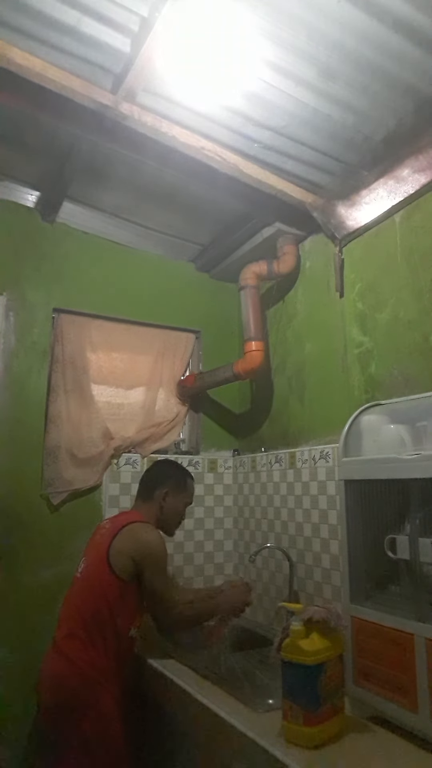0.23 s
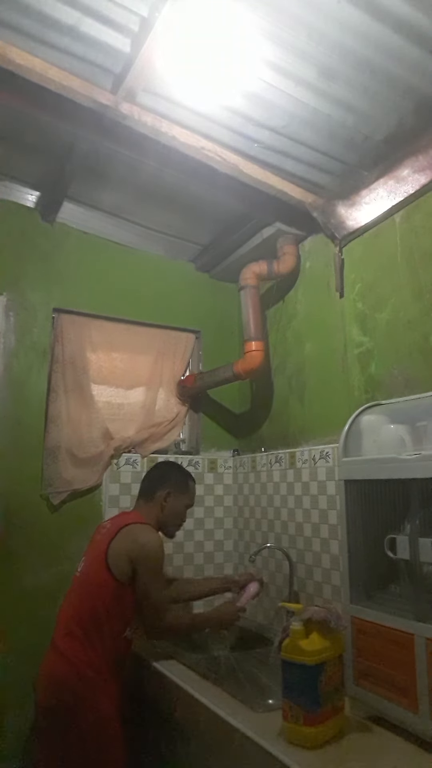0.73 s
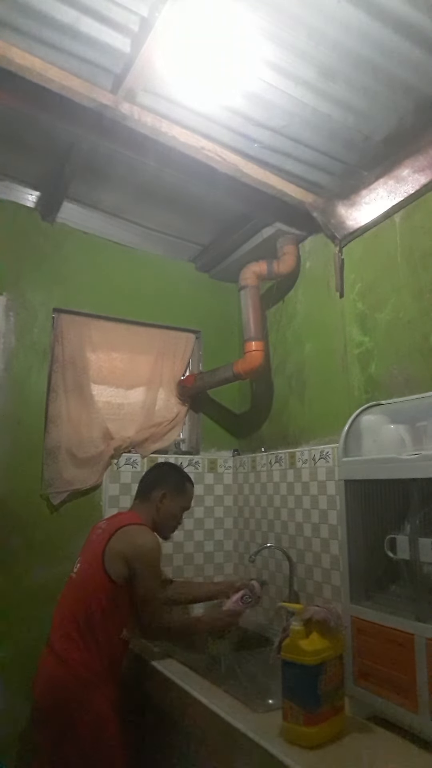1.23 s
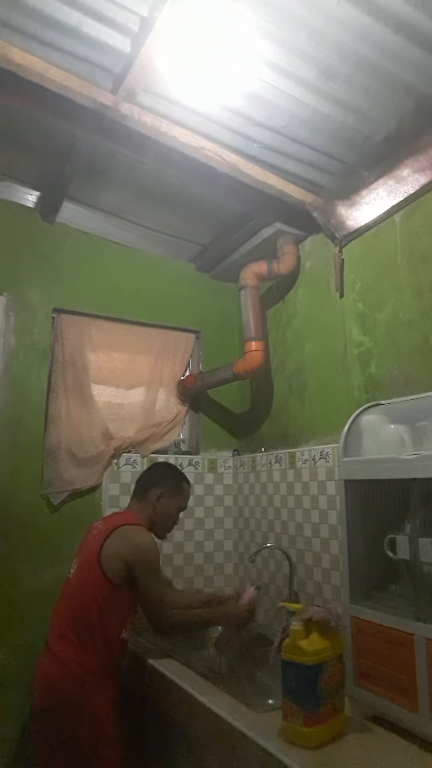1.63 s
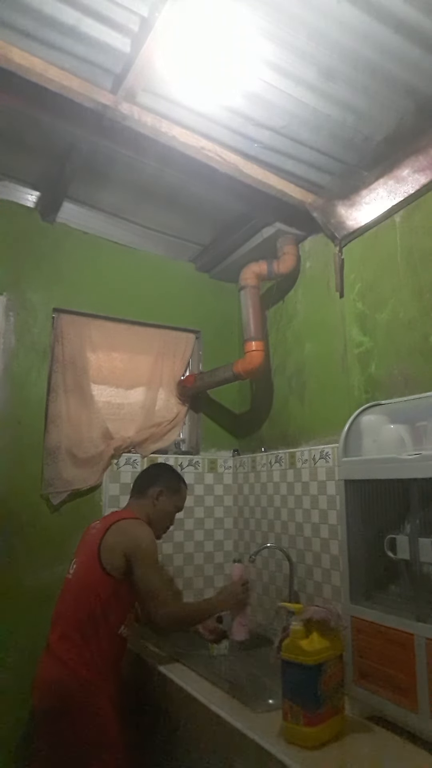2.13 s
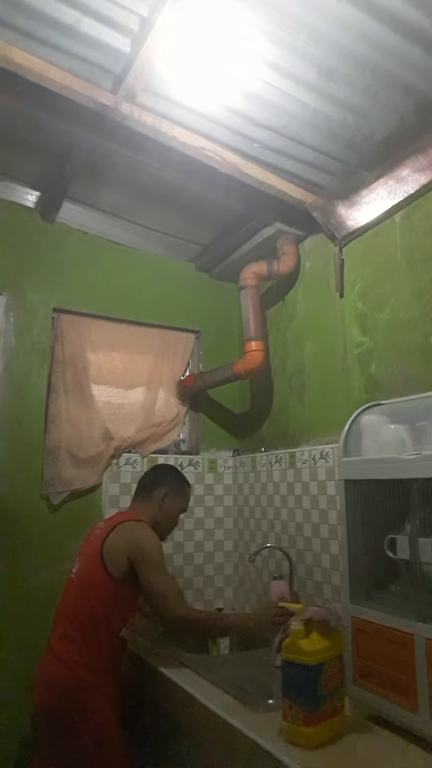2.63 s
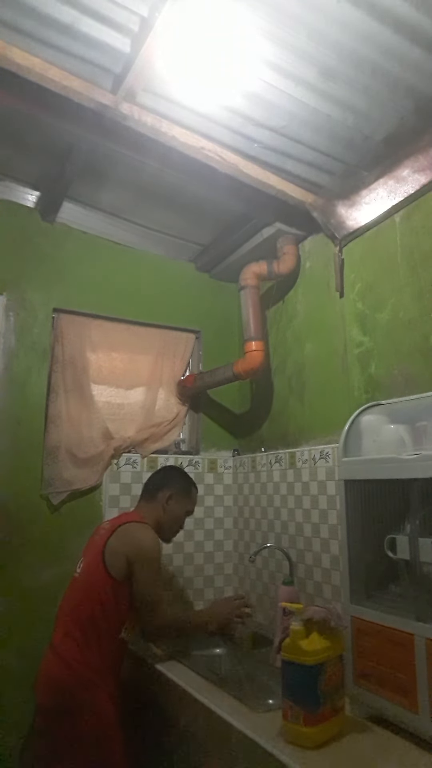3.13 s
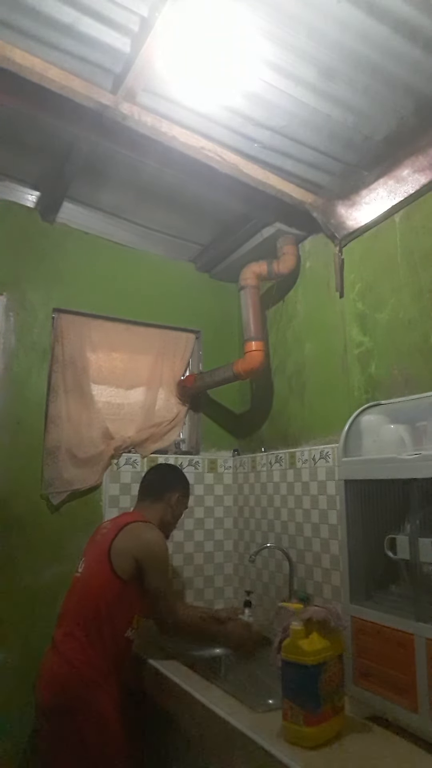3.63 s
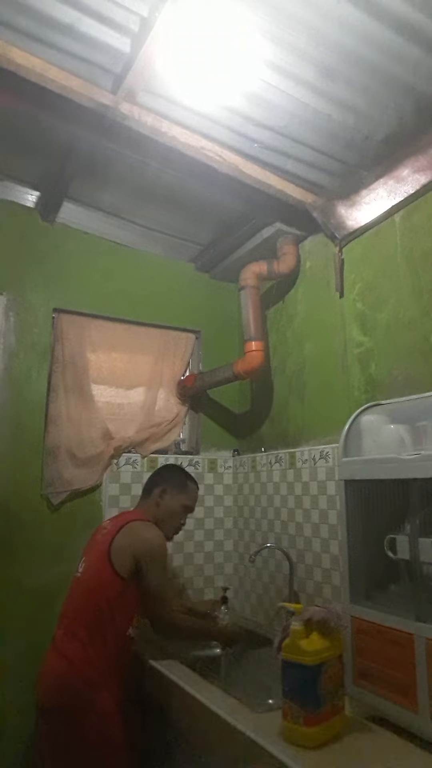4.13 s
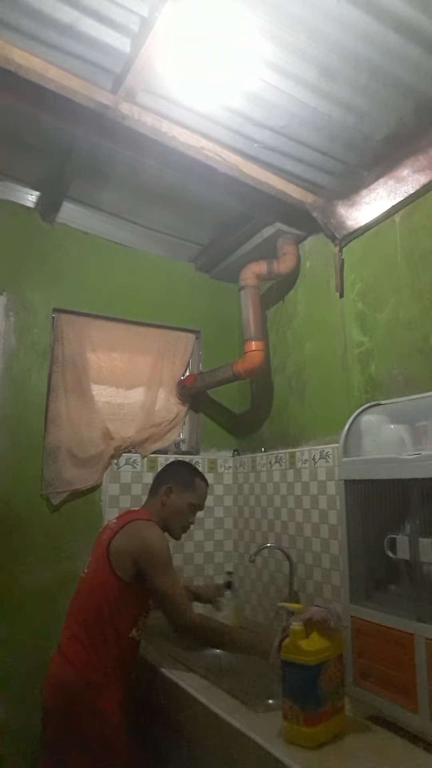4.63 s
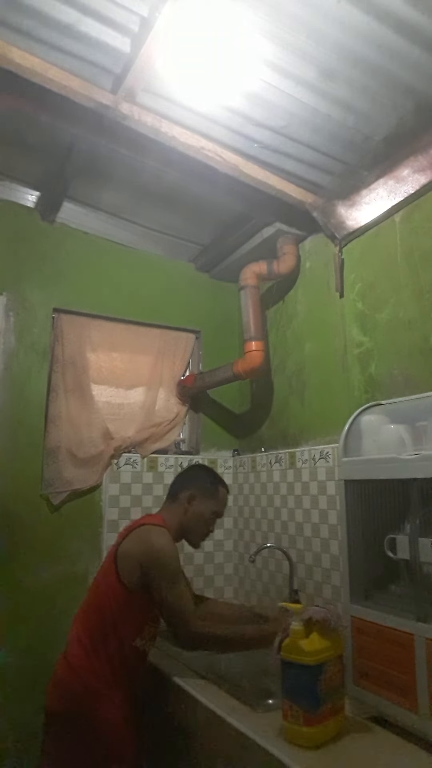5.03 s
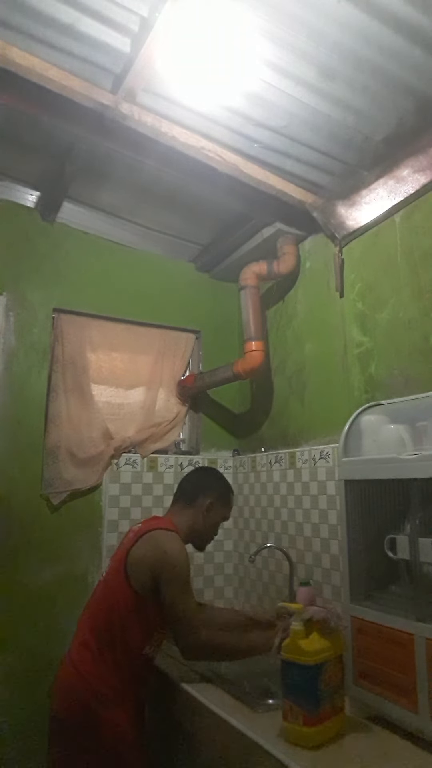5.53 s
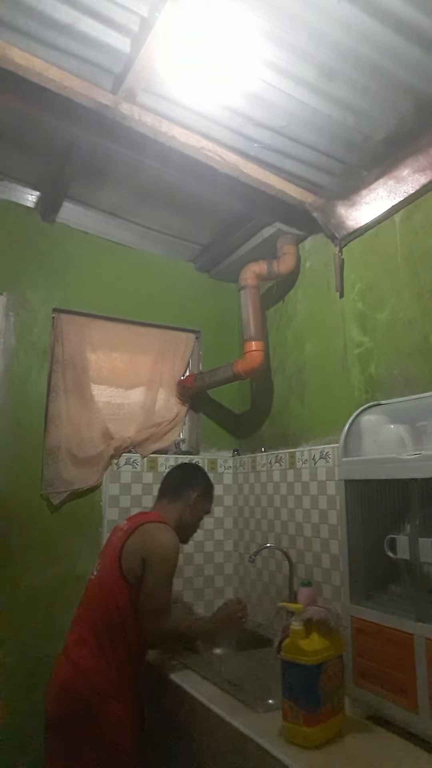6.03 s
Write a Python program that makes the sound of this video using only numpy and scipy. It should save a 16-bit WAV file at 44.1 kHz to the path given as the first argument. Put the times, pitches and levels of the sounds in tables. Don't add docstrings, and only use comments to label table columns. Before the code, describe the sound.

Wet dishes are rubbed and tapped in a hollow metal sink, then one heavy dull thud booms through the basin, followed by scattered knocks.

```python
import sys
import numpy as np
from scipy import signal
from scipy.fft import rfft, irfft
from scipy.io import wavfile
from scipy.ndimage import uniform_filter1d

SR = 44100
rng = np.random.default_rng(int(sys.argv[2]) if len(sys.argv) > 2 else 0)


def ratio_of_db(decibels):
    return 10 ** (np.asarray(decibels, float) / 20)


def master(y):
    cut = np.clip(np.atleast_2d(y).T, -1, 1)
    pcm = np.round(cut * 32767)
    wavfile.write(sys.argv[1], SR, pcm.astype(np.int16))


N = 277389
T = np.arange(N) / SR
PIECE_T = np.arange(8192) / SR
DECAY_60 = np.log(1000)


def unit(x):
    return x / np.sqrt(np.mean(x ** 2))


def curve(table, col):
    rows = np.array(table)
    return ratio_of_db(np.interp(T, rows[:, 0], rows[:, col]))


def band(x, lo_hz, hi_hz):
    sos = signal.butter(2, [lo_hz, min(hi_hz, .45 * SR)], "band", fs=SR, output="sos")
    return signal.sosfilt(sos, x)


def coloured(points, size=N):
    hz, db = np.transpose(points)
    f = np.fft.rfftfreq(size, 1 / SR) + 1
    gain = ratio_of_db(np.interp(np.log(f), np.log(hz), db))
    return unit(irfft(rfft(rng.standard_normal(size)) * gain, size))


def walk(rate):
    k = int(SR / rate)
    return unit(uniform_filter1d(rng.standard_normal(N)[np.arange(N) // k], k))


def ring(force, modes):
    out = 0
    for pitch_hz, level_db, t60_s in modes:
        pole = np.exp(2j * np.pi * pitch_hz / SR - DECAY_60 / (t60_s * SR))
        ringing = signal.lfilter([0, pole.imag], [1, -2 * pole.real, abs(pole) ** 2], force)
        out = out + ratio_of_db(level_db) * ringing
    return out


def add(track, start_s, piece):
    i = max(int(start_s * SR), 0)
    track[i:i + len(piece)] += piece[:N - i]


def burst(length_s, rise_s):
    noise = rng.standard_normal(len(PIECE_T))
    return noise * (1 - np.exp(-PIECE_T / rise_s)) * np.exp(-PIECE_T / length_s)


def after(times_s, levels_db, t60_s, swell_s=0.01):
    t = T[::32]
    age = np.maximum(t - np.array(times_s)[:, None], 0)
    swell = (1 - np.exp(-age / swell_s)) ** 2
    power = ratio_of_db(2 * np.array(levels_db)) @ (swell * np.exp(-2 * DECAY_60 * age / t60_s))
    return np.interp(T, t, power)


# (pitch_hz, level_db per Hz)
AIR_COLOUR = [(24, -38.5), (40, 1.5), (80, 1), (139, -4.5), (202, -10.5), (325, -2.5), (387, -15),
              (722, -14.5), (860, -17.5), (1080, -22), (2850, -27), (7920, -44), (13400, -35),
              (15500, -31.5)]


def air():
    level_db = -59
    return ratio_of_db(level_db + 0.5) * coloured(AIR_COLOUR) * ratio_of_db(.5 * walk(3.4))


# (start_s, peak_db, centre_hz, length_s)
SPLASHES = [(0.004, -49, 2470, 0.022), (0.17, -60.5, 4480, 0.035), (0.6094, -62, 3420, 0.035),
            (1.0173, -67.5, 3390, 0.035), (1.1351, -52.5, 3130, 0.034), (1.203, -59, 3500, 0.023),
            (1.5846, -62, 4340, 0.044), (1.8674, -63, 2930, 0.037), (2.17, -60.5, 4030, 0.035),
            (2.5466, -55, 2900, 0.034), (3.897, -49, 3320, 0.0264), (4.168, -57, 3500, 0.035),
            (4.33, -64, 4600, 0.046), (4.42, -56, 3060, 0.035), (4.557, -50, 2250, 0.036),
            (5.0105, -67.5, 3200, 0.032), (5.1841, -57, 2960, 0.03), (5.377, -62, 3520, 0.035),
            (5.862, -59, 2100, 0.035), (5.6377, -70, 3000, 0.035)]


def splashes():
    out = np.zeros(N)
    for start_s, peak_db, centre_hz, length_s in SPLASHES:
        fizz = band(burst(length_s, rise_s=0.0029), centre_hz / 1.65, centre_hz * 1.027)
        add(out, start_s, ratio_of_db(peak_db + 4.5) * band(fizz, centre_hz / 1.13, centre_hz * 1.4))
    return out


# (start_s, peak_db, length_s)
TICKS = [(0.1146, -58.5, 0.012), (1.133, -52.5, 0.011), (1.4481, -63.5, 0.011), (1.964, -55.5, 0.014),
         (2.208, -59, 0.012), (2.4743, -62.5, 0.011), (2.833, -60, 0.012), (2.9981, -60.5, 0.013),
         (3.901, -48, 0.014), (4.207, -66, 0.012), (4.334, -59, 0.013), (4.4024, -58, 0.012),
         (5.009, -57, 0.01), (5.532, -61.5, 0.012), (5.8416, -54, 0.011), (5.9683, -59, 0.012)]


def ticks():
    out = np.zeros(N)
    for start_s, peak_db, length_s in TICKS:
        add(out, start_s, ratio_of_db(peak_db - 1.5) * burst(length_s, rise_s=0.00071))
    return band(band(out, 11500, 18000), 11550, 18000)


# (time_s, level_db)
SPRAY = [(0, -75), (0.33, -81), (1.1, -78), (1.35, -77), (1.8, -77), (3.05, -73.5), (3.38, -79),
         (3.88, -79), (4.0, -74), (4.6, -74), (5.8, -73.5), (6.29, -75)]


def spray():
    mist_db, mist_t60_s = -16, .3
    hiss = unit(band(rng.standard_normal(N), 11200, 15000)) * ratio_of_db(.7 * walk(15))
    start_s, peak_db, _ = np.transpose(TICKS)
    mist = after(start_s, peak_db + mist_db, mist_t60_s)
    return ratio_of_db(-3.5) * hiss * np.sqrt(curve(SPRAY, 1) ** 2 + mist)


def water(stir):
    fizz = unit(band(rng.standard_normal(N), 3140, 5200)) * stir ** .4 * ratio_of_db(2.2 * walk(18))
    return splashes() + ticks() + spray() + ratio_of_db(-55.5) * fizz


# (middle_s, pitch_hz, length_s, level_db)
RUBS = [(0.64, 320, 0.1, -45.5), (0.802, 265, 0.055, -57), (0.891, 300, 0.066, -52),
        (1.03, 165.8, 0.12, -48.5), (1.045, 585, 0.037, -53.5), (1.158, 318, 0.107, -51.5),
        (1.283, 330, 0.16, -59), (1.466, 311, 0.048, -55.5), (1.64, 148, 0.047, -54),
        (1.708, 318, 0.064, -49), (1.836, 228, 0.12, -52), (1.87, 560, 0.11, -62), (2.114, 320, 0.072, -52),
        (2.173, 80.6, .08, -52), (2.379, 415, 0.27, -53), (2.698, 70, 0.25, -43.5),
        (3.173, 318, 0.16, -54.5), (3.811, 316, 0.086, -51.5), (4.939, 72, 0.036, -43),
        (4.16, 200, 0.13, -48), (5.207, 760, 0.1, -56.5), (5.43, 544, 0.093, -43), (5.45, 200, 0.116, -42),
        (5.93, 195, 0.068, -53), (4.0, 856, 0.11, -47), (0.861, 1750, 0.035, -74), (5.9, 509, 0.074, -48),
        (2.481, 1250, 0.027, -66), (5.651, 87, 0.15, -46), (6.22, 469.6, 0.11, -51)]


def rubs():
    out = np.zeros(N)
    t = np.arange(-SR // 4, SR // 4) / SR
    for middle_s, pitch_hz, length_s, level_db in RUBS:
        wobble = 1 + 0.019 * np.sin(2 * np.pi * (9 * t + rng.random()))
        tone = np.sin(2 * np.pi * pitch_hz * np.cumsum(wobble) / SR)
        swell = np.exp(-(2 * t / length_s) ** 2)
        add(out, middle_s + t[0], ratio_of_db(level_db + 2.0) * swell * tone)
    return out * ratio_of_db(2.4 * walk(45))


# (time_s, level_db)
HANDS = [(0, -54.5), (0.25, -58.5), (0.5, -61), (0.65, -58), (0.85, -61), (1.17, -53.5), (1.4, -61),
         (1.5, -56), (1.86, -55.5), (1.98, -59.5), (2.25, -57.5), (2.8, -55.5), (3.1, -53), (3.36, -64),
         (3.87, -64), (4.5, -55), (5.7, -54), (6.29, -54)]
# (over_hands_db, over_blow_db, growth_db per dB of blow, t60_s)
SHUDDER = [
    (-3.5, -10.5, 0.78, 0.41),
    (1, -13, 0.99, 0.39),
    (-3.5, -7.5, 0.96, 0.48),
    (-11, -6, 1.12, .45),
]


def shudder():
    start_s, basin_db, boom_db, _, clatter_db = np.transpose(contacts())
    rim_db = (basin_db + clatter_db) / 2
    strengths = []
    for hit_db, row in zip((boom_db, basin_db, rim_db, clatter_db), SHUDDER):
        work_db, blow_db, growth, t60_s = row
        work = ratio_of_db(work_db) * curve(HANDS, 1)
        left_over = after(start_s, blow_db + growth * hit_db, t60_s)
        strengths.append(np.sqrt(work ** 2 + left_over))
    return strengths


# (pitch_hz, level_db, t60_s)
COUNTER = [(70, 5.5, 0.14), (87, 1.5, 0.36), (107, -13.5, 0.04)]
# (pitch_hz, level_db, t60_s)
BASIN = [(152.6, -2.5, 0.21), (200, -6, 0.27), (275, 1.5, 0.1), (318, 2, 0.19), (338, -9.5, 0.35)]
# (pitch_hz, level_db, t60_s)
RIM = [(415, -5, 0.28), (450.7, -1.5, 0.13), (488.2, 2, 0.062), (560, 2, 0.047), (612.6, -2.5, 0.067),
       (663, -5.5, 0.039), (754, -6.5, 0.078), (855, -15, 0.21)]
# (pitch_hz, level_db, t60_s)
WALLS = [(894, -5, .08), (997, -1.5, 0.062), (1110, -5.5, 0.046), (1193, -4.5, 0.041), (1322, 0, 0.021),
         (1426, 0, 0.022), (1560, -3, 0.033), (1750, 0.5, 0.011), (2050, -8, 0.015), (2253, -13, 0.028),
         (2530, -37, 0.06)]


def hands(strengths):
    out, effort = 0, walk(14)
    for strength, modes in zip(strengths, (COUNTER, BASIN, RIM, WALLS)):
        grip = ratio_of_db(2.7 * effort + 0.83 * walk(40)) * rng.standard_normal(N)
        shake = ring(band(grip, 0.63 * modes[0][0], 1.266 * modes[-1][0]), modes)
        hold = np.sqrt(uniform_filter1d(shake ** 2, int(.08 * SR)))
        out = out + strength * shake / hold
    return ratio_of_db(-2.0) * out


# (start_s, basin_db, boom_db, dish_hz, clatter_db)
BLOWS = [(0.110, -37, -57, 419, -53), (2.545, -25, -26.5, 208, -45), (2.576, -29, -46, 415, -45),
         (2.608, -26.5, -45, 197.2, -56), (2.676, -43, -55, 194.5, -62), (3.893, -20, -29, 232, -36),
         (3.911, -9.5, -10, 275, -34.5), (3.951, -28.5, -36.5, 362, -41.5), (3.981, -21, -45, 207.5, -51.5),
         (4.036, -16, -23, 139.5, -47), (4.089, -26, -25.5, 283, -49.5), (4.399, -39, -53, 432, -51.5),
         (4.125, -36.5, -36, 200, -58.5), (4.723, -45, -37, 326, -68), (4.852, -33, -33.5, 331, -55.5),
         (4.885, -46, -32.5, 318, -59), (5.174, -23.5, -26.5, 329.4, -46.5),
         (5.269, -33.5, -33, 338, -54.5), (5.393, -26.5, -32, 229, -41), (5.415, -25, -25.5, 204, -49),
         (5.808, -36, -43, 428, -52.5), (5.909, -34.5, -37.5, 190.4, -58), (6.046, -29.5, -32, 143, -51),
         (6.093, -38, -55, 299, -62)]
# (start_s, basin_db, dish_hz, clatter_db)
TAPS = [(0.004, -47.5, 321, -57.5), (0.208, -47, 286, -55.5), (0.438, -50, 308, -62),
        (0.704, -55, 325, -61.5), (0.746, -43.5, 364, -72), (0.948, -41, 352, -61.5),
        (1.127, -42, 314, -62), (1.209, -40.5, 354, -61), (1.451, -43, 327, -64), (1.54, -40, 347, -62),
        (1.597, -46, 363, -58), (1.676, -45, 324, -72), (2.115, -48, 343, -58), (2.206, -37, 422, -52.5),
        (2.245, -44, 452, -53.5), (2.296, -41, 334, -56.5), (2.32, -49, 325, -59), (2.46, -41, 423, -58),
        (2.915, -38, 469, -47.5), (3.012, -37.5, 424.5, -53), (3.061, -40, 324, -49.5),
        (3.155, -42, 298, -58.5), (4.336, -39.5, 323, -56), (4.556, -33, 430, -47),
        (4.768, -41.5, 290, -53), (4.998, -40, 321, -49.5), (5.524, -35, 312, -50.5),
        (5.868, -31, 338, -49), (6.169, -43, 415, -59)]


def contacts():
    tap_boom_db = -23
    taps = [(start_s, basin_db, basin_db + tap_boom_db, dish_hz, clatter_db)
            for start_s, basin_db, dish_hz, clatter_db in TAPS]
    return BLOWS + taps


def knocks():
    rattle_s, crunch_rise_s, crunch_s = 0.013, 0.0045, 0.023
    boom, basin, clatter, dish = np.zeros((4, N))
    push = np.exp(-PIECE_T / 0.002) * PIECE_T
    dish_shape = (1 - np.exp(-PIECE_T / 0.0054)) * np.exp(-DECAY_60 * PIECE_T / 0.18)
    for start_s, basin_db, boom_db, dish_hz, clatter_db in contacts():
        force = burst(rattle_s, rise_s=0.0014)
        stretch = np.exp(PIECE_T / rattle_s - PIECE_T / crunch_s)
        crunch = force * (1 - np.exp(-PIECE_T / crunch_rise_s)) * stretch
        force = force / np.sqrt(np.sum(force ** 2))
        crunch = crunch / np.sqrt(np.sum(crunch ** 2))
        add(boom, start_s, ratio_of_db(boom_db) * push / push.sum())
        add(basin, start_s, ratio_of_db(basin_db) * force)
        add(clatter, start_s, ratio_of_db(clatter_db + 1.0) * crunch)
        add(dish, start_s, ratio_of_db(basin_db) * np.sin(2 * np.pi * dish_hz * PIECE_T) * dish_shape)
    counter = ratio_of_db(-3.0) * band(ring(boom, COUNTER), 68, 400)
    hollow = ratio_of_db(-17) * ring(band(basin, 120, 1000), BASIN)
    rim = ratio_of_db(2.0) * ring(band(clatter, 380, 1130), RIM)
    walls = ratio_of_db(-6) * ring(band(clatter, 600, 2760), WALLS)
    thud = ratio_of_db(19.5) * band(band(clatter, 350, 2200), 300, 3900)
    return counter + hollow + rim + walls + ratio_of_db(-5.5) * dish + thud


# (pitch_hz, t60_s)
ROOM_T60 = [(60, 0.62), (300, 0.79), (1000, 0.29), (3000, 0.24), (12000, .15)]


def room(x):
    t = np.arange(SR) / SR
    hz, t60_s = np.transpose(ROOM_T60)
    tail = 0
    for f in 60 * 2. ** np.arange(8):
        fade = np.exp(-DECAY_60 * t / np.interp(np.log(f), np.log(hz), t60_s))
        octave = band(rng.standard_normal(SR), f / np.sqrt(2), f * np.sqrt(2))
        octave = octave * fade * (1 - np.exp(-t / 0.012))
        tail = tail + octave * np.sqrt(f / SR / np.sum(octave ** 2))
    return signal.fftconvolve(x, tail)[:N]


def scene():
    strengths = shudder()
    near = knocks() + water(strengths[-1])
    mono = air() + ratio_of_db(-1.0) * rubs() + hands(strengths) + ratio_of_db(-7.0) * room(near) + near
    return np.array([mono, mono])


def roll_off(x):
    return signal.sosfilt(signal.butter(12, 15750, fs=SR, output="sos"), x)


# (pitch_hz, level_db per Hz)
SELF_NOISE = [(100, -2), (700, 0.5), (3200, -2), (7300, -12.5), (12300, -8.5), (15500, -6.5)]


def record(dry):
    x = signal.sosfilt(signal.butter(8, 65, "high", fs=SR, output="sos"), dry)
    rumble = ratio_of_db(-82.5) * band(rng.standard_normal(N), 15, 45) * np.sqrt(SR / 60)
    hiss = ratio_of_db(-74) * coloured(SELF_NOISE)
    mix = x + rumble + np.array([hiss, -hiss])
    return roll_off(mix)


dry = scene()
out = record(dry)
master(out)
```